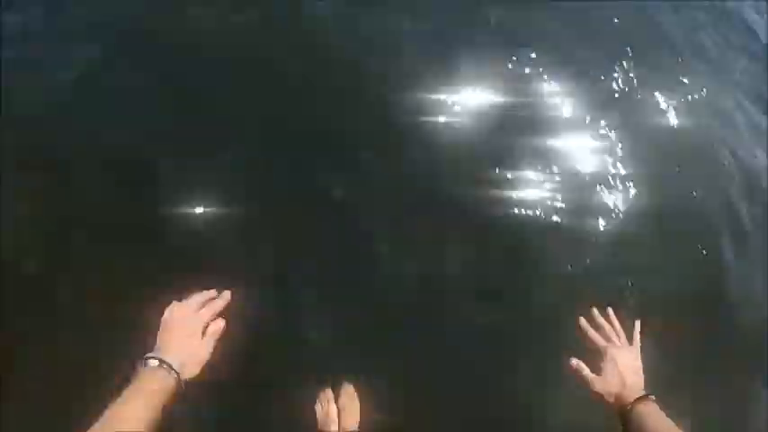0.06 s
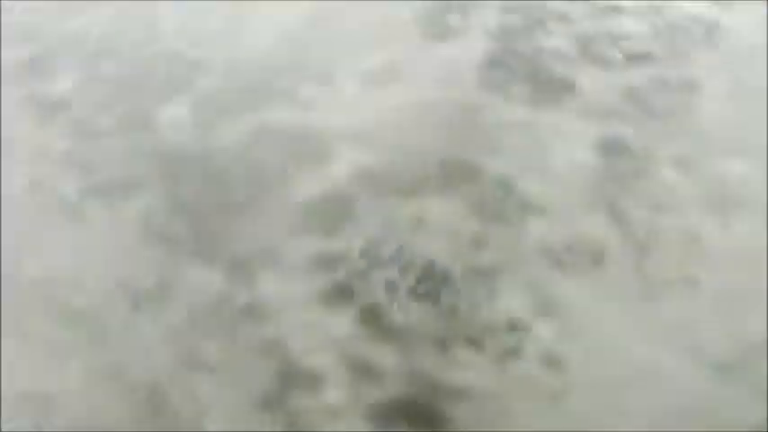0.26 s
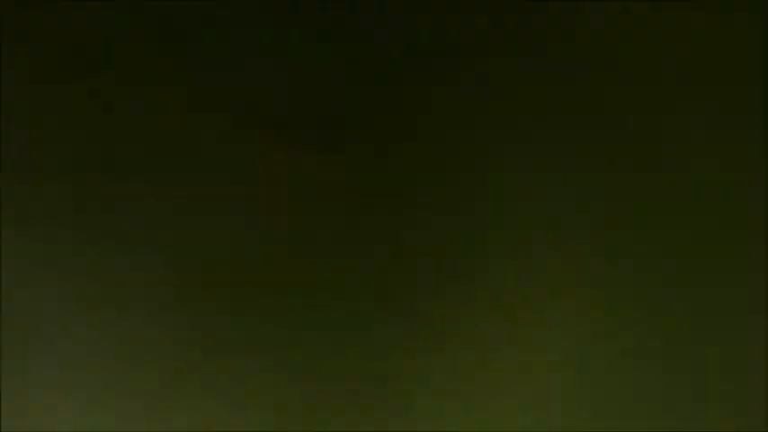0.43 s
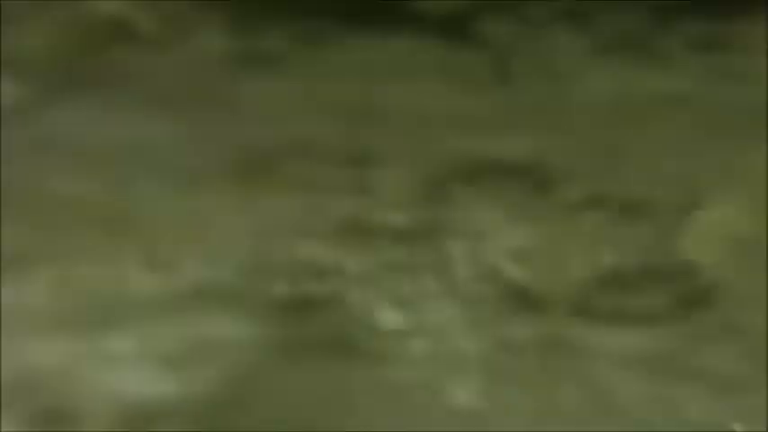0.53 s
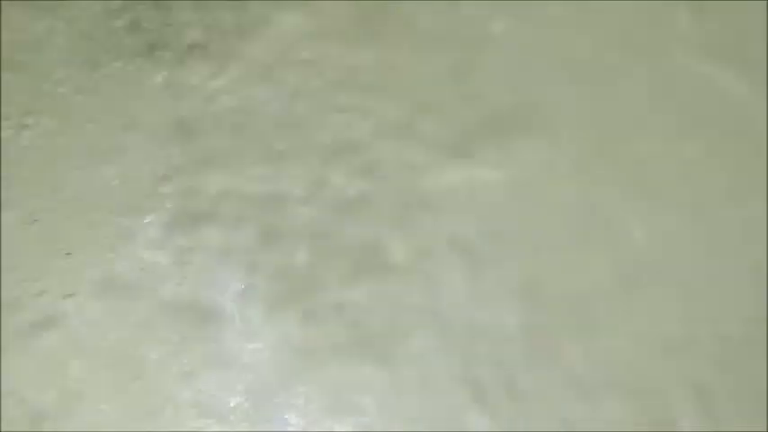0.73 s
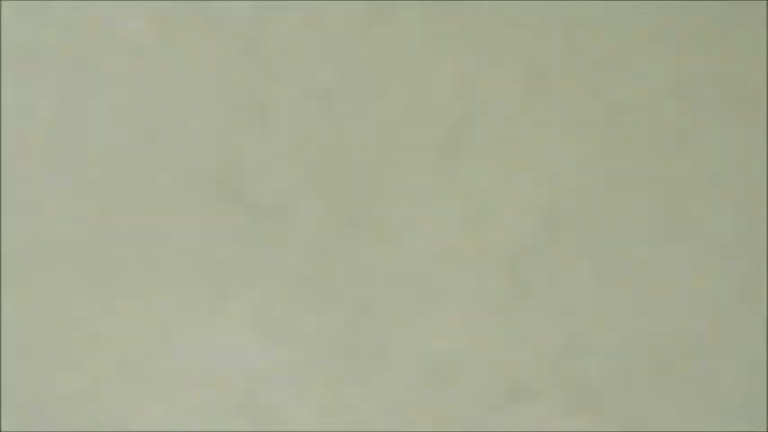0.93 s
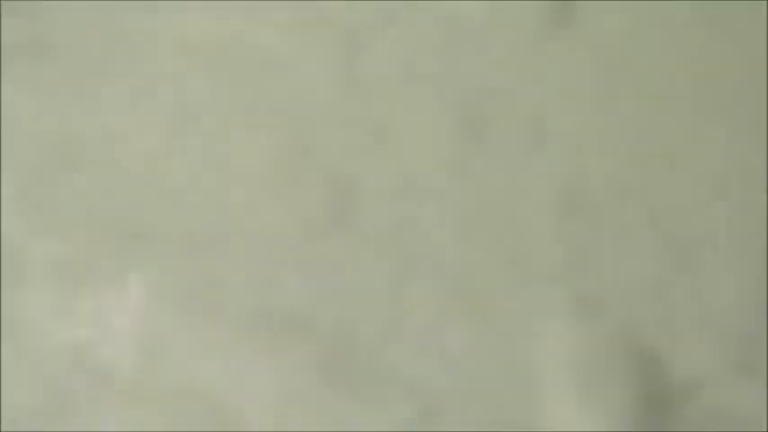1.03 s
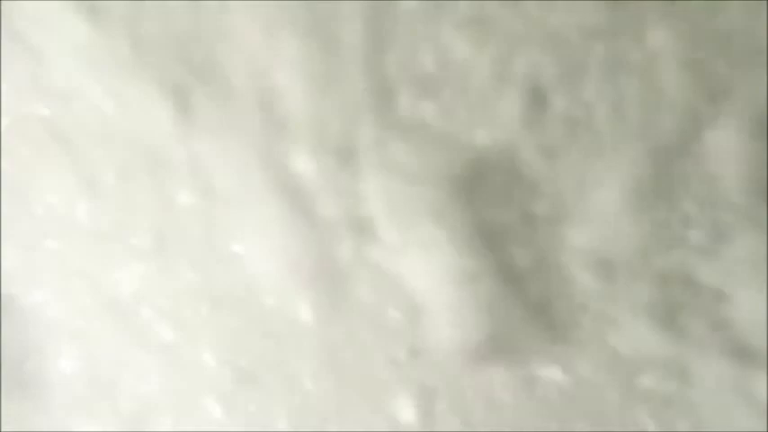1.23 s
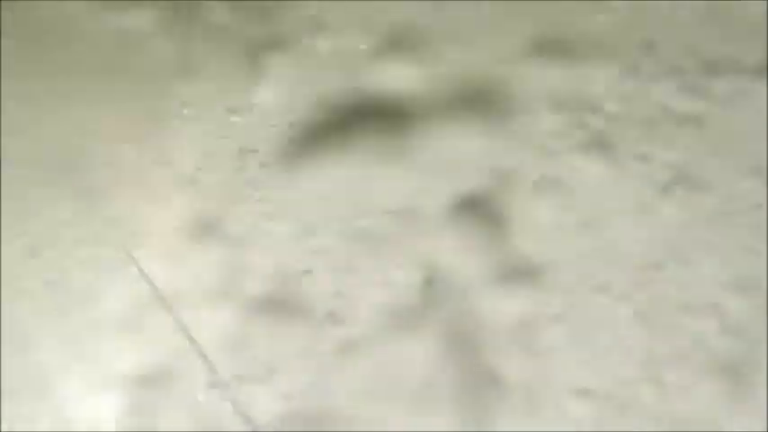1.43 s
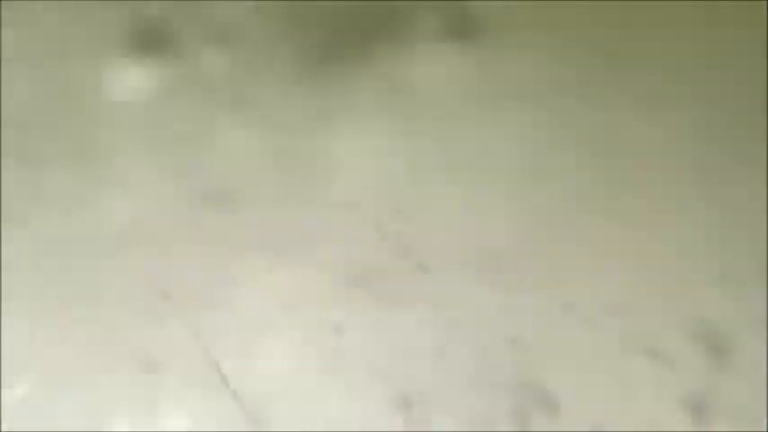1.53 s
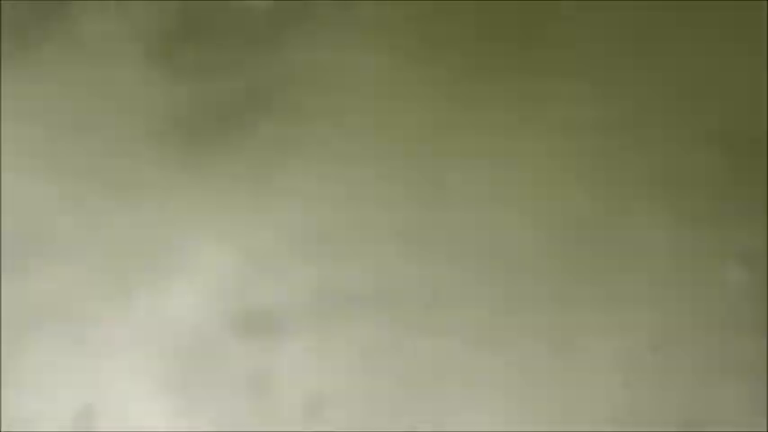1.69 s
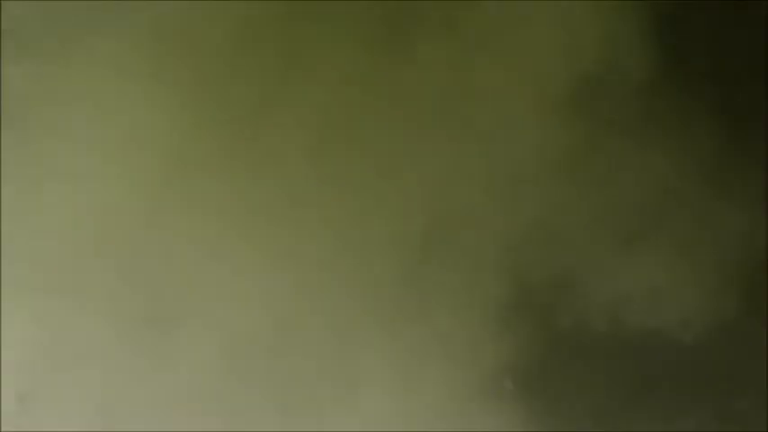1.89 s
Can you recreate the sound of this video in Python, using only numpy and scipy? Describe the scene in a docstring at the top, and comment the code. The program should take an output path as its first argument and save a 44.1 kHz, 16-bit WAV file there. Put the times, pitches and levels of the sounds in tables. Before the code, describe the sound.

A body splashes into a lake with a deep thump, a burst of spray and sharp slaps of water. The microphone goes under too, where foam fizzes and muffled bubbles gurgle and tick past, then thin out.

```python
"""A body plunges into a lake, heard from inside a waterproof case that goes under with the swimmer.
The entry thumps as big pockets of trapped air pulse; spray bursts and water slaps the case.
Then fine foam fizzes, small bubbles tick, and a muffled bubble cloud gurgles past, swelling
and thinning out. Behind it all sits low buffeting, with open air giving way to underwater hiss."""
import sys
import numpy as np
from scipy import signal
from scipy.io import wavfile

SR = 44100
rng = np.random.default_rng(int(sys.argv[2]) if len(sys.argv) > 2 else 0)


def generate_wav(sig):
    """Save sig (samples, or channels by samples) to the path in sys.argv[1] as 16-bit PCM at SR."""
    pcm = np.round(np.clip(np.atleast_2d(sig).T, -1, 1) * 32767).astype(np.int16)
    wavfile.write(sys.argv[1], SR, pcm)


N = 85995

# Fader moves for the buffeting and the foam: (time [s], level [dB])
BUFFET_FADER = [(.04, -55), (.15, -40.5), (.85, -38.5), (1.8, -60.5)]
FOAM_FADER = [(.195, -81), (.21, -50), (.43, -43.5), (.49, -61), (.503, -39), (.568, -33), (.598, -62.5),
              (.625, -44.5), (.81, -39), (1.0, -35.5)]
# Fader moves for the bubble cloud: (time [s], gurgle [dB], rumble [dB], babble [dB])
CLOUD_FADERS = [(.35, -61.5, -59, -59), (.6, -37.5, -36, -46.5), (.72, -36, -41.5, -41.5),
                (.86, -29, -31, -41), (1.17, -32, -37, -43), (1.22, -24, -26.5, -37),
                (1.38, -24.5, -28, -38.5), (1.49, -24.5, -45.5, -45), (1.6, -31.5, -33.5, -57.5),
                (1.66, -30, -40, -49.5), (1.73, -39.5, -40.5, -56.5), (1.95, -41.5, -37.5, -62.5)]
# Tone of the buffeting, open air and underwater hiss: (frequency [Hz], relative level [dB])
BUFFET_EQ = [(30, -9), (60, -2.5), (140, -39), (700, -43.5)]
AIR_EQ = [(1100, -5.5), (2100, -2), (5800, -14.5), (7700, -15), (9500, -25.5)]
HISS_EQ = [(1700, 1), (2600, 8.5), (4200, -16.5), (16000, -30)]
# Tone of the bubbles, from the largest down to foam: (frequency [Hz], relative level [dB])
RUMBLE_EQ = [(40, -33.5), (80, -7.5), (150, 0), (300, -30.5)]
GURGLE_EQ = [(100, -35.5), (190, 1.5), (430, -2.5), (660, -2.5), (950, -21), (1500, -43)]
BABBLE_EQ = [(600, -11.5), (1000, 0), (1900, -7), (2500, -9.5), (3300, -20), (5000, -37), (14000, -58.5)]
CRACKLE_EQ = [(3000, -14), (5500, -7), (14000, -32)]
FOAM_EQ = [(150, -33), (600, 0.5), (2700, 9), (4000, -1.5), (6000, -1.5), (15000, -21)]
# Tone of the case when water hits it: (frequency [Hz], relative level [dB])
CASE_EQ = [(100, -3), (450, -7.5), (1100, -7.5), (1500, -1), (2800, -5), (4500, -12), (5900, -11.5),
           (8500, -18.5), (15000, -28)]
# Small bubbles pinging on the case: (time [s], ring peak [dB], pitch [Hz])
TICK_CUES = [(0.846, -38, 7740), (.875, -31.5, 2190), (0.928, -47, 7600), (1.039, -46, 5240),
             (1.107, -50, 4400), (1.127, -31, 3770), (1.195, -36, 2870), (1.232, -32, 1710),
             (1.262, -34.5, 2240), (1.307, -39.5, 6000), (1.35, -35, 2310), (1.3772, -31, 7200),
             (1.4199, -27, 4810), (1.4416, -43, 5970), (1.682, -48, 5800)]
# Water slapping the case: (time [s], crack level [dB], decay [s], ring pitch [Hz], low-pass [Hz])
SLAP_CUES = [(0.078, -48.5, 0.0027, 2970, 5120), (0.0911, -40, 0.0092, 1830, 3130),
             (0.206, -19, 0.0031, 1770, 13100), (0.351, -30.5, 0.0047, 2200, 6250),
             (0.4078, -16.5, 0.01, 1590, 1900), (0.4231, -15.5, 0.0015, 1260, 8400),
             (0.4244, -9, 0.0016, 2620, 11300), (.431, -10.5, 0.0021, 2777, 7560),
             (0.498, -11.5, 0.0018, 2790, 9800), (0.5006, -19, 0.0057, 2400, 6000),
             (.634, -24, 0.0048, 706, 1910), (0.8019, -21, 0.0034, 1470, 1800),
             (1.229, -22.5, 0.0017, 1110, 1360), (1.362, -29.5, 0.008, 2144, 3130),
             (1.520, -33, 0.0029, 2595, 3500)]
# Sheets of spray: (time [s], level before the tone tilt [dB])
SPRAY_CUES = [(0.2618, -31), (0.271, -23), (0.2833, -15), (.292, -15.5), (0.2976, -9), (0.3051, -15.5),
              (0.321, -21)]
# Pockets of trapped air: (time [s], pitch [Hz], peak [dB], attack [s])
POCKET_CUES = [(0.2052, 72.4, -8, 0.0049), (0.223, 34.3, -13.5, 0.0046), (0.25, 57.4, -21.5, 0.012),
               (0.411, 76.6, -17.5, 0.0039), (0.46, 231, -27, 0.003), (0.5665, 104, -5, 0.0016),
               (.578, 161, -11, 0.0037), (.618, 297, -21.5, 0.002), (.945, 77.6, -24.5, 0.034),
               (1.193, 242, -5, 0.00033), (1.229, 870, -15.5, 0.0019), (1.253, 435, -16.5, 0.0067),
               (1.303, 133, -11.5, 0.003), (1.358, 231, -13.5, 0.0034), (1.387, 404, -16, 0.002),
               (1.550, 439, -18.5, 0.0037), (1.553, 1160, -30, 0.0021), (1.57, 168, -20, 0.012),
               (1.821, 573, -28.5, 0.0029), (1.834, 121.5, -26.5, 0.012)]

SUBMERGED_S, AIR_DB, HISS_DB = 0.202, -58, -59.5
GLIDE_PER_S = 0.6  # upward bend of ticks and pockets, as a share of the starting pitch


def amp(db):
    """Decibels to gain."""
    return 10 ** (np.asarray(db) / 20)


def unit(x):
    """Scales to rms 1."""
    return x / np.std(x)


def clock():
    """Time of every sample."""
    return np.arange(N) / SR


def fader(rows, column=1):
    """Gain over time from one dB column of a table."""
    rows = np.array(rows)
    return amp(np.interp(clock(), rows[:, 0], rows[:, column]))


def add(mix, start_s, sound):
    """Drops a sound into the mix on its cue."""
    part = mix[max(round(start_s * SR), 0):][:len(sound)]
    part += sound[:len(part)]


def colour(x, eq, size=4096):
    """Minimum-phase EQ of unit energy that rolls off above its last point."""
    hz, db = np.transpose(eq)
    freqs = abs(np.fft.fftfreq(size, 1 / SR))
    rolloff_db = 30 * np.log2(np.maximum(freqs / hz[-1], 1))
    curve_db = np.interp(np.log(freqs + 1), np.log(hz), db) - rolloff_db
    log_gain = np.log(amp(np.maximum(curve_db, -100)))
    taps = np.fft.ifft(np.exp(np.conj(signal.hilbert(log_gain)))).real
    return signal.fftconvolve(x, taps / np.linalg.norm(taps))[:len(x)]


def noise(eq):
    """Steady noise through an EQ."""
    return unit(colour(rng.standard_normal(N), eq))


def impacts(per_s, spread_db):
    """Random clicks of either sign, a few much hotter than the rest."""
    chance, size, sign = rng.random((3, N))
    accent_db = spread_db * np.minimum(-np.log(1 - size), 3.5)
    return (chance < per_s / SR) * np.sign(sign - .5) * amp(accent_db)


def ping(hz, attack_s, glide_per_s):
    """A tone that swells, rings and dies; a glide bends it upward like a bubble."""
    t = np.arange(0, 10 * attack_s, 1 / SR)
    envelope = t / attack_s * np.exp(1 - t / attack_s)
    return envelope * np.sin(2 * np.pi * hz * t * (1 + glide_per_s * t / 2))


def swarm(eq, per_s, spread_db, cycles, rise, sizes=32):
    """Bubbles born at random; each peaks after `cycles`, its pitch up by the share `rise`."""
    out = np.zeros(N)
    low_hz, high_hz = eq[0][0], eq[-1][0]
    steps = (np.arange(sizes) + rng.random(sizes)) / sizes
    for hz in low_hz * (high_hz / low_hz) ** steps:
        attack_s = cycles / hz
        births = impacts(per_s / sizes, spread_db)
        out += signal.oaconvolve(births, hz * ping(hz, attack_s, rise / attack_s))[:N]
    return unit(colour(out, eq))


def background():
    """The bed: air, then water, buffets the moving case; open air cuts to a dull hiss on going under."""
    buffet = fader(BUFFET_FADER) * noise(BUFFET_EQ)
    air = amp(AIR_DB) * noise(AIR_EQ)
    hiss = amp(HISS_DB) * noise(HISS_EQ)
    return buffet + np.where(clock() > SUBMERGED_S, hiss, air)


def bubble_ticks():
    """Small bubbles pop against the case: a brief ring and a softer, dry snap."""
    out = np.zeros(N)
    snap_envelope = np.exp(-clock() / 0.00094)
    for start_s, db, hz in TICK_CUES:
        attack_s = 0.00079 * (4080 / hz) ** 2  # tiny bubbles peak and die sooner
        add(out, start_s, amp(db) * ping(hz, attack_s, GLIDE_PER_S))
        add(out, start_s, amp(db - 11.5) * snap_envelope * noise(CRACKLE_EQ))
    return out


def foam(breakup_s=0.8, thinning_s=0.026):
    """Fine froth fizzes over the sinking case, then breaks up into single crackles."""
    t = clock()
    density = np.exp(-np.maximum(t - breakup_s, 0) / thinning_s)
    froth = colour(impacts(per_s=13000 * density, spread_db=7.0), FOAM_EQ)
    return fader(FOAM_FADER) * froth / np.std(froth[t < breakup_s])


def bubble_cloud():
    """Bubbles stream past: large ones rumble, middling ones gurgle, small ones babble and crackle."""
    gurgle = swarm(GURGLE_EQ, per_s=1000, spread_db=0.5, cycles=1.23, rise=0.039)
    rumble = swarm(RUMBLE_EQ, per_s=900, spread_db=1.0, cycles=0.93, rise=0.024)
    babble = swarm(BABBLE_EQ, per_s=3600, spread_db=2.5, cycles=2.2, rise=0.005)
    crackle = swarm(CRACKLE_EQ, per_s=40, spread_db=3, cycles=1.2, rise=0.002)
    gurgle_gain, rumble_gain, babble_gain = (fader(CLOUD_FADERS, column) for column in (1, 2, 3))
    crackle_gain = amp(-48.5) * np.sqrt(babble_gain)  # rides the babble fader at half the dB swing
    return gurgle_gain * gurgle + rumble_gain * rumble + babble_gain * babble + crackle_gain * crackle


def water_slaps(attack_share=0.039, bright_hz=5110):
    """Water smacks the case: a short crack coloured by the shell, with one ringing note."""
    out, t = np.zeros(N), np.arange(SR // 10) / SR
    for start_s, db, decay_s, ring_hz, lowpass_hz in SLAP_CUES:
        envelope = np.exp(-t / decay_s) * (1 - np.exp(-t / (attack_share * decay_s)))
        crack = colour(rng.standard_normal(len(t)) * envelope, CASE_EQ)
        crack = signal.lfilter(*signal.butter(2, lowpass_hz, fs=SR), crack)
        crack *= np.sqrt(decay_s * SR / 2 / np.sum(crack ** 2))  # energy of a decay from rms 1
        add(out, start_s, amp(db) * crack)
        ring_gain = amp(db + 6) * min(1, bright_hz / lowpass_hz)  # bright slaps ring less
        add(out, start_s, ring_gain * ping(ring_hz, attack_s=0.00085, glide_per_s=0))
    return out


def spray(attack_s=0.0013, decay_s=0.006, neutral_s=0.3, tilt_db_per_s=193.5):
    """Sheets of drops rattle the case; fine drops land first, so each sheet is duller than the last."""
    out, t = np.zeros(N), clock()
    drops = unit(colour(impacts(per_s=18000, spread_db=2.5), CASE_EQ))
    lows = signal.sosfiltfilt(signal.butter(2, 2800, fs=SR, output="sos"), drops)
    highs = drops - lows
    for start_s, db in SPRAY_CUES:
        age = np.maximum(t - start_s, 0)
        envelope = np.tanh(age / attack_s) * np.exp(-age / decay_s)
        tilt = amp(tilt_db_per_s * (start_s - neutral_s))
        out += amp(db) * envelope * (lows * tilt + highs / tilt)
    return out


def air_pockets():
    """The weight of the plunge: trapped air pulses in deep thumps and glugs."""
    out = np.zeros(N)
    for start_s, hz, db, attack_s in POCKET_CUES:
        add(out, start_s, amp(db) * ping(hz, attack_s, GLIDE_PER_S))
    return out


def scene():
    """All layers sum to mono inside the case."""
    mix = water_slaps() + air_pockets() + bubble_ticks() + spray()
    return (mix + foam() + bubble_cloud() + background())[None]


def record(dry, ceiling=0.52, lowpass_hz=15600):
    """A soft clip rounds the hottest peaks, then a steep low-pass trims the top end."""
    clipped = dry / (1 + (dry / ceiling) ** 6) ** (1 / 6)
    return signal.sosfiltfilt(signal.butter(14, lowpass_hz, fs=SR, output="sos"), clipped)


dry = scene()
out = record(dry)
generate_wav(out)
```